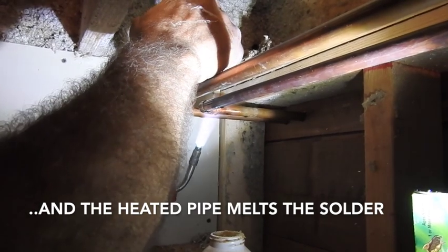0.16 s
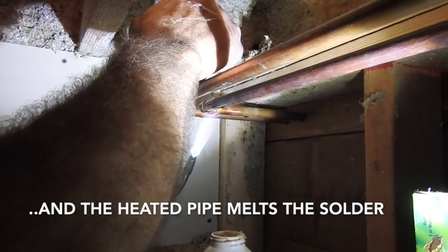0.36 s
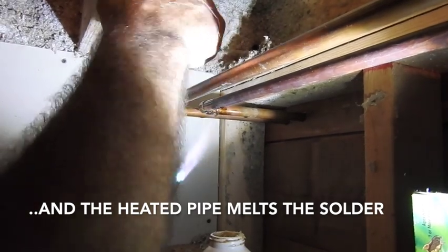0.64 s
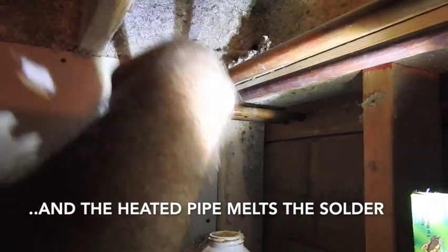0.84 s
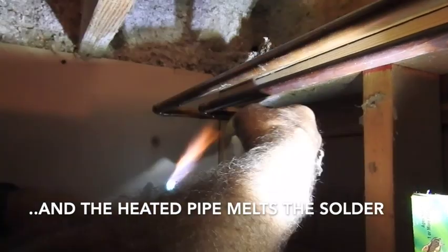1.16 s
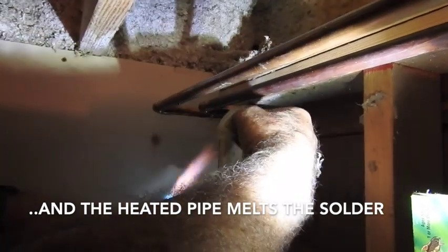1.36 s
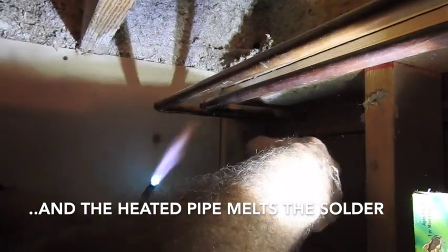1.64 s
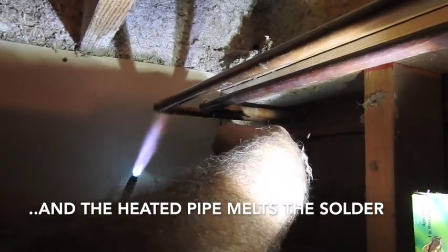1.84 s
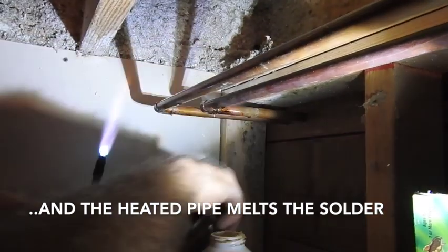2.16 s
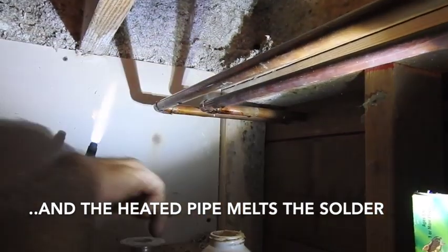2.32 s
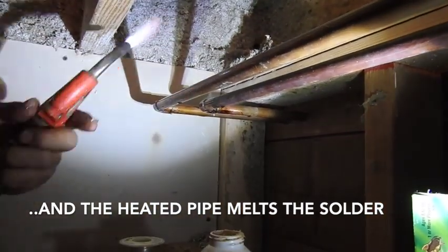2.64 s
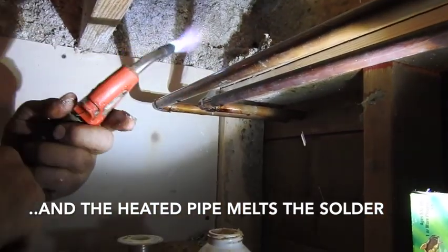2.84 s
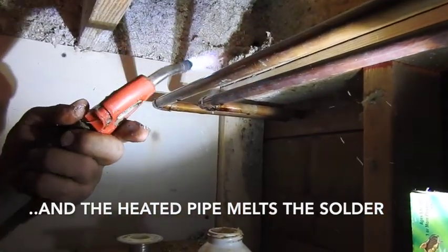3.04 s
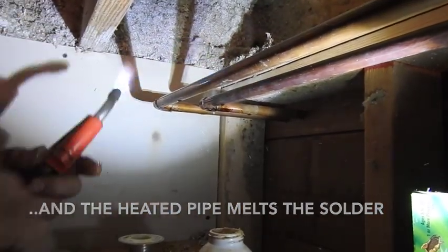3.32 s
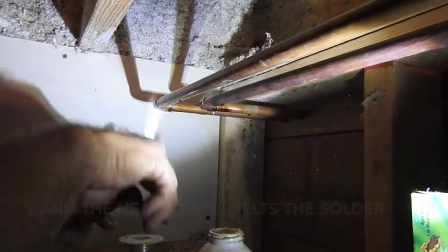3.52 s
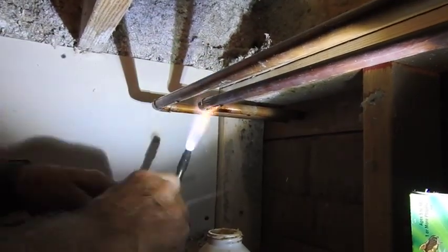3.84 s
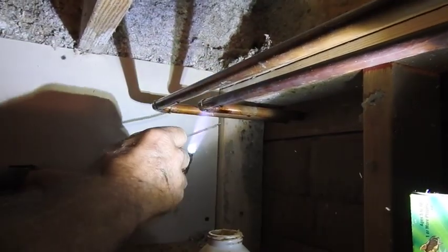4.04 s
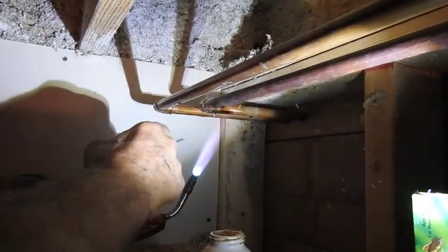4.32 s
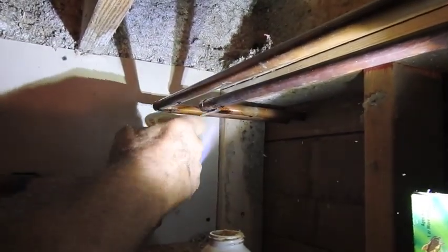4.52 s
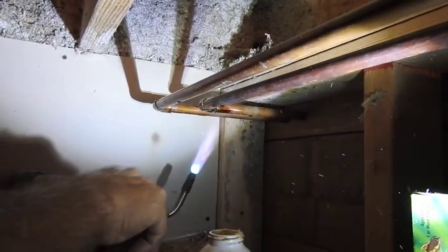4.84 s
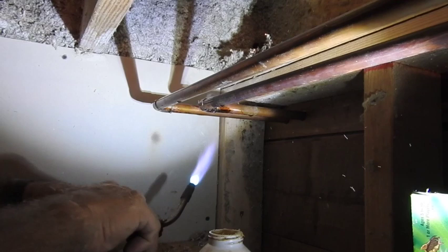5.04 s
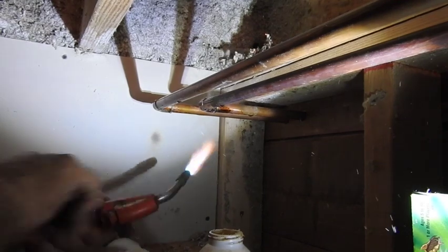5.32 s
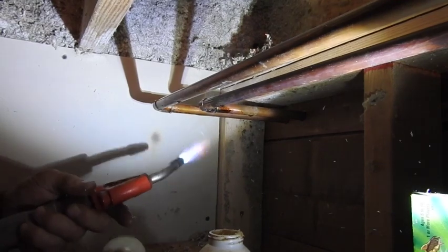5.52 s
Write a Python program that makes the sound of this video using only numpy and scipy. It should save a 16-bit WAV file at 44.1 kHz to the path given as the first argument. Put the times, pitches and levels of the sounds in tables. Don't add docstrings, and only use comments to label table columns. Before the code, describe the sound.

A hand-held gas torch roars with a loud, steady bright hiss and a fuzzy high whistle in a narrow wooden space.

```python
import sys
import numpy as np
from scipy import signal
from scipy.io import wavfile

SR = 44100
rng = np.random.default_rng(int(sys.argv[2]) if len(sys.argv) > 2 else 0)


def transcribe(signal):
    frames = np.atleast_2d(signal).T
    limited = np.clip(frames, -1, 1)
    pcm = np.round(limited * 32767).astype(np.int16)
    wavfile.write(sys.argv[1], SR, pcm)


def attenuation_scalar(level_db):
    decades = np.asarray(level_db, float) / 20
    return 10 ** decades


N = 250474

# [t/s, jet hiss level/dB, nozzle aim as extra top treble level/dB]
TORCH_TURNS = [(0.0, -20, -24), (0.3, -22, -25), (0.72, -22, -32), (0.95, -21.5, -26), (1.4, -21.5, -20),
               (1.95, -21, -23), (2.28, -21.3, -32), (2.55, -21, -24), (2.72, -21.5, -33),
               (2.95, -21.5, -25), (3.45, -22, -19), (3.75, -21.8, -33), (4.0, -22, -21),
               (4.33, -21.5, -32), (4.7, -21, -22), (4.95, -21.8, -22), (5.4, -22, -29), (5.68, -21.5, -25)]
# [f/Hz, level/dB per Hz]
JET_COLOUR = [(40, -50), (62, -23), (150, -17), (350, -20), (700, -12), (1500, -10.5), (2100, -11.5),
              (3000, -3.5), (4200, -2), (8500, -0.5), (10000, -3), (11500, -12.5), (13000, -21),
              (14200, -19)]
# [f/Hz, width/Hz, level/dB over the jet]
BAY_MODES = [(188, 52, 4.5), (270, 49, -4.5), (362, 24, -8), (466, 55, 7.5), (684, 34, -1.5),
             (744, 39, -12.5), (998, 180, 5), (1041.4, 41, -27), (1083, 38, 3.5), (1155, 65, -4),
             (1346, 101, 10.5), (1520, 33, 10.5), (1995, 41, 8.5), (2037, 53, -13), (2329, 40, 12),
             (2800, 224, 4), (3320, 490, 10), (3816, 120, -3.5), (4060, 94, 1), (4570, 71, -7.5),
             (5360, 760, 2), (8980, 800, 4)]
# [middle t/s, length/s, f/Hz, width/Hz, level/dB]
PASSING_MODES = [(2.77, 1.02, 2310, 142, 4.5), (4.13, 0.86, 2300, 160, 1.5), (5.39, 0.95, 2310, 107, -7.5),
                 (.93, 0.44, 1420, 400, -6.5), (0.97, 0.53, 834, 93, -17), (3.57, 0.73, 900, 220, -14),
                 (0.13, 0.36, 1000, 330, -7.5), (4.165, 0.18, 850, 240, 5.5), (1.77, 2.9, 606, 80, -16),
                 (3.53, 0.64, 620, 200, 6.5), (2.89, 0.51, 560, 190, -7.5), (4.77, 2.6, 610, 100, -9),
                 (3.2, 0.12, 4170, 340, 8), (3.94, 2.5, 2990, 550, -6.5), (2.2, 0.2, 4300, 196, 7.5),
                 (1.65, 0.21, 2920, 300, 5), (4.2, 0.28, 2850, 330, 10), (3.35, 1.05, 1334, 82, -4.5),
                 (5.8, 0.99, 2100, 107, -10), (5.03, 0.81, 4030, 160, 11.5), (5.32, 2, 1630, 180, 7),
                 (4.85, 0.31, 1820, 66, -6), (3.04, 0.38, 6500, 160, 6), (1.49, 0.38, 5240, 183, 6.5)]
# [middle t/s, length/s, level/dB]
NOZZLE_GLINTS = [
    (0.73, 0.4, 5.5),
    (2.12, 0.18, 8),
    (3.3, 0.32, 3),
    (4.641, 0.15, 13),
    (5.22, 0.36, 6.5),
]
# [middle t/s, length/s, f/Hz, level/dB]
HAND_SPLASHES = [(.93, .08, 3680, 7), (2.06, .06, 3750, 9), (3.25, .2, 3800, 8), (4.045, .04, 3760, 12),
                 (4.67, .05, 3900, 8), (4.67, .05, 2850, 8), (5.5, .35, 3140, 7), (2.4, .4, 4600, 5),
                 (.1, .25, 5300, 3), (2.3, .8, 2080, -7), (2.3, .3, 3880, -10), (3.5, .55, 2320, -7),
                 (4.7, .3, 2320, -6), (.3, .6, 2680, -7), (3.95, .3, 2530, -10), (1.1, .3, 2930, -7),
                 (3.38, .3, 4220, -5), (3.55, .5, 3950, 4), (.15, .3, 4830, 4), (3.27, .12, 520, 6)]
# [f/Hz, level/dB]
ECHO_LEVEL = [(300, -14), (1500, -5.5), (2600, -8.5), (4300, 3), (10000, 7)]
# [f/Hz, level/dB]
DIFFUSE_LEVEL = [(60, -20), (300, -20), (600, -12), (1200, -17), (2400, -5), (4000, -11.5), (6000, -10),
                 (10000, -18), (13000, -17)]
# [f/Hz, left minus right level/dB]
STEREO_LEAN = [(60, 0.0), (110, 1.5), (200, -4.5), (360, -4), (670, 2), (1210, 0), (2210, -1.5), (4040, 0),
               (7370, -2.5), (13400, -2)]
# [f/Hz, lead/rad]
LEFT_LEAD = [(3000, 0), (7500, .5), (9500, 1.5), (11500, 2.6)]
# [start t/s, length/s, f/Hz, level/dB]
LOW_CATCHES = [(0.037, .45, 3330, -23.5), (0.571, 0.15, 3320, -20), (0.928, .2, 3280, -18.5),
               (1.125, .12, 3310, -13.5), (1.262, .13, 3300, -20.5), (1.56, .2, 3300, -27.5),
               (1.924, .1, 3290, -18.5), (2.097, .03, 3290, -20.5), (2.191, 0.14, 3340, -15.5),
               (2.378, .28, 3280, -16), (3.163, .03, 3290, -24), (3.348, 0.083, 3250, -21),
               (3.68, 0.1276, 3330, -25), (3.94, .07, 3280, -20.5), (4.296, .12, 3370, -25.5),
               (4.657, .32, 3260, -25), (5.148, 0.13, 3340, -19), (5.587, 0.076, 3300, -15.5)]
# [start t/s, length/s, f/Hz, level/dB]
HIGH_CATCHES = [(0.0, 0.12, 3493, -24.5), (0.42, .15, 3490, -22), (0.643, 0.12, 3424, -17.5),
                (0.898, 0.36, 3498, -19.5), (1.431, 0.11, 3576, -22.5), (1.879, 0.047, 3460, -30),
                (2.03, .04, 3680, -23), (2.2, 0.165, 3457, -20.5), (2.5, .09, 3420, -22),
                (2.701, .25, 3500, -18), (3.03, 0.11, 3514, -19.5), (3.209, 0.15, 3587, -22),
                (3.551, 0.0855, 3554, -23), (3.82, .08, 3520, -24), (4.04, 0.19, 3543, -20),
                (4.36, 0.16, 3460, -26.5), (4.54, 0.14, 3560, -17.5), (4.69, 0.074, 3480, -20),
                (5.151, .22, 3433, -23.5)]
# [t/s, peak level/dB, f/Hz, length/s]
FLOOR_KNOCKS = [
    (4.447, -41, 69, 0.027),
]
# [t/s, left minus right level/dB]
TORCH_SWING = [
    (0.0, 2.0),
    (0.05, -0.5),
    (4.24, -1.5),
    (4.37, 1),
    (4.75, -3),
    (4.84, -0.5),
    (5.44, -2),
    (5.68, 1.0),
]


def read(points, hz):
    f, value = np.transpose(points)
    return np.interp(np.log(hz + 1), np.log(f + 1), value)


def bell(x, middle, width):
    return 2. ** -(2 * (x - middle) / width) ** 2


def plateau(t, middle, length):
    return 2. ** -(2 * (t - middle) / length) ** 4


def drift(t, count, low_hz, top_hz):
    f = np.geomspace(low_hz, top_hz, num=16)
    cycles = f * t[:, None] + rng.random((count, 1, len(f)))
    waves = np.sin(2 * np.pi * cycles) / np.sqrt(f)
    return waves.sum(2) / np.sqrt(np.sum(.5 / f))


def jet(hz, t, level_db, aim_db):
    colour_db = read(JET_COLOUR, hz) + sum(db * bell(hz, f, w) for f, w, db in BAY_MODES)
    top = (hz > 4200) & (hz < 10000)
    colour_db -= 10 * np.log10(np.sum(attenuation_scalar(colour_db[top]) ** 2))

    glint_hz, glint_width_hz, splash_width_hz = 9160, 240, 154
    waves = PASSING_MODES + [(s, d, glint_hz, glint_width_hz, db) for s, d, db in NOZZLE_GLINTS]
    waves += [(s, d, f, splash_width_hz, db) for s, d, f, db in HAND_SPLASHES]
    moving_db = sum(db * np.outer(bell(hz, f, w), plateau(t, s, d)) for s, d, f, w, db in waves)

    follow = np.clip(hz / 5000, 0, 1)[:, None]
    level_db = level_db.mean() + follow * (level_db - level_db.mean())
    beam = 0.9 * np.clip((hz - 9800) / 2200, 0, 1)
    beam_lower_db = 2.5
    beam_db = np.outer(beam, aim_db - aim_db.mean() - beam_lower_db)
    return attenuation_scalar(colour_db[:, None] + moving_db + level_db + beam_db)


def echoes(hz, t, first_ms, last_ms, fade_db, sway_ms, port_ms, count=20):
    place, side, sign = rng.random((count, 3)).T
    delay = first_ms + (last_ms - first_ms) * (np.arange(count) + place) / count
    gain = attenuation_scalar(fade_db * delay / last_ms) * np.sign(sign - .5)
    gain = gain / np.linalg.norm(gain)
    delay = delay[:, None] + sway_ms * drift(t, count, 0.2022, 4.0)
    port_delay = port_ms * (2 * side - 1)
    field = np.zeros((2, len(hz), len(t)), np.complex64)
    for g, ms, s in zip(gain, delay, port_delay):
        lag = np.outer(2 * np.pi * hz, ms / 1000).astype(np.float32)
        ports = g * np.exp(-1j * np.pi * np.outer([s, -s], hz) / 1000)
        field += (np.cos(lag) - 1j * np.sin(lag)) * ports[..., None].astype(np.complex64)
    share = attenuation_scalar(read(ECHO_LEVEL, hz))[:, None]
    return (1 + share * field) / np.sqrt(1 + share ** 2)


def flame():
    frame, hop, bins = 2048, 512, 660
    hz, t, noise = signal.stft(rng.standard_normal((3, N)), SR, nperseg=frame, noverlap=frame - hop)
    hz, noise = hz[:bins], noise[:, :bins] * np.sqrt(frame / 2)
    s, hiss_db, aim_db = np.transpose(TORCH_TURNS)
    paths = echoes(hz, t, first_ms=0.4774, last_ms=11.0, fade_db=-11, sway_ms=0.052, port_ms=0.048)

    gust, tremor = drift(t, 2, 2.5, 9.0)
    level_db = np.interp(t, s, hiss_db) + 0.4 * gust
    aim_db = np.interp(t, s, aim_db) + 2 * tremor
    colour = jet(hz, t, level_db, aim_db)

    apart = attenuation_scalar(read(DIFFUSE_LEVEL, hz))[:, None]
    source = (noise[0] + apart * noise[1:]) / np.sqrt(1 + apart ** 2)
    ports = attenuation_scalar(read(STEREO_LEAN, hz) / 2) * np.exp(.5j * read(LEFT_LEAD, hz))
    z = paths * source * colour * np.array([ports, 1 / ports])[..., None]
    z = np.pad(z, ((0, 0), (0, frame // 2 + 1 - bins), (0, 0)))
    return attenuation_scalar(1.93) * signal.istft(z, nperseg=frame, noverlap=frame - hop)[1][:, :N]


def strand(centre_hz, width_hz, level_db):
    r = np.exp(-np.pi * width_hz / SR)
    a, b = rng.standard_normal((2, N))
    slow = signal.lfilter([1], np.poly([r, r, r]), a + 1j * b)
    slow = slow / abs(slow) ** 0.22
    x = (slow * np.exp(2j * np.pi * np.cumsum(centre_hz) / SR)).real
    return x / x.std() * attenuation_scalar(level_db)


def catches(t, table, rest_db):
    catch_s, release_s = 0.011, 0.022
    s, length, hz, db = np.transpose(table)[..., None]
    rise = (t - s) / catch_s + 1
    fall = (s + length - t) / release_s + 1
    hold = np.clip(np.minimum(rise, fall), 0, 1)
    pitch = np.interp(t, np.hstack([s, s + length]).ravel(), np.repeat(hz, repeats=2))
    return pitch, rest_db + (hold * (db - rest_db)).max(0)


def whistle():
    flick_hz, flutter_db = 18, 2
    t, song = np.arange(N) / SR, 0
    frames, coarse = t[::64], t[::512]
    *flicks, wander, swell = (np.interp(t, coarse, d) for d in drift(coarse, 4, 1.5, 16.0))
    flutters = flutter_db * drift(frames, 2, 5.0, 30.0)
    strands = [(LOW_CATCHES, -32.5, 105), (HIGH_CATCHES, -30.5, 130)]  # catches, rest dB, width Hz
    for (table, rest_db, width_hz), flick, flutter in zip(strands, flicks, flutters):
        hz, db = catches(frames, table, rest_db)
        centre_hz = np.interp(t, frames, hz) + flick_hz * flick
        song = song + strand(centre_hz, width_hz, np.interp(t, frames, db + flutter))
    across = strand(3400 + 70 * wander, 350, -30 + 1.7 * swell)
    return song + np.array([across, -across])


def bumps():
    t = np.arange(N) / SR
    return sum(attenuation_scalar(db) * bell(t, s, d) * np.sin(2 * np.pi * hz * (t - s)) for s, db, hz, d in FLOOR_KNOCKS)


def scene():
    s, db = np.transpose(TORCH_SWING)
    swing_db = np.interp(np.arange(N) / SR, s, db)
    swing_db = (swing_db - swing_db.mean()) / 2
    pan = attenuation_scalar(np.array([swing_db, -swing_db]))
    return (flame() + whistle()) * pan + bumps()


def band_limit(x):
    return signal.sosfilt(signal.butter(12, 14050, fs=SR, output="sos"), x)


def record(dry):
    low_cut = signal.butter(2, 53, "high", fs=SR, output="sos")
    cut = signal.sosfilt(low_cut, dry)
    rounded = 1.25 * np.tanh(cut / 1.25)
    return band_limit(rounded)


dry = scene()
out = record(dry)
transcribe(out)
```